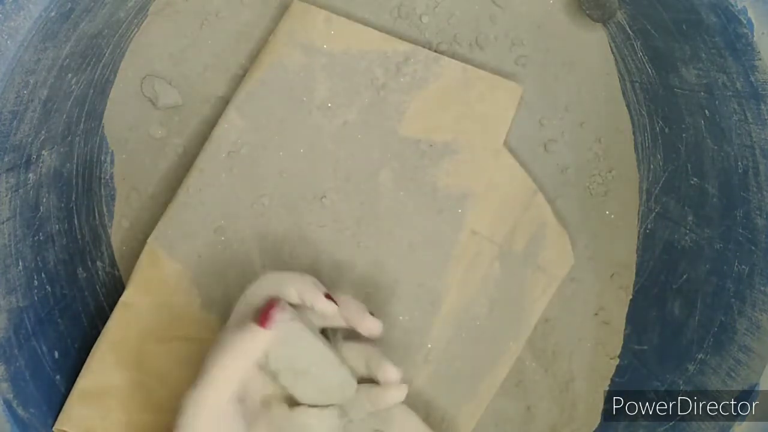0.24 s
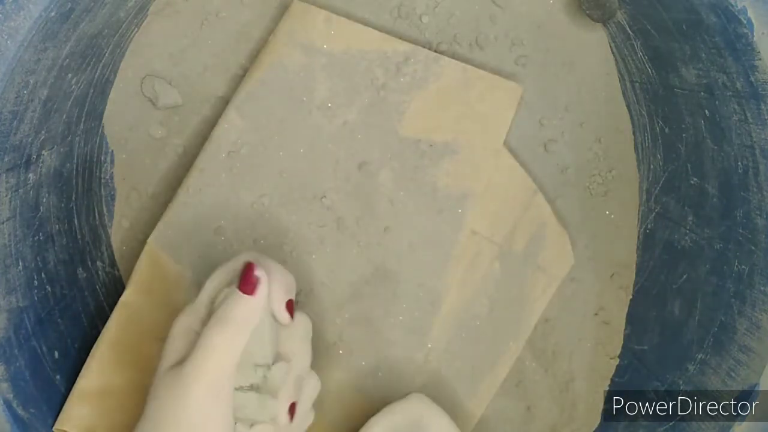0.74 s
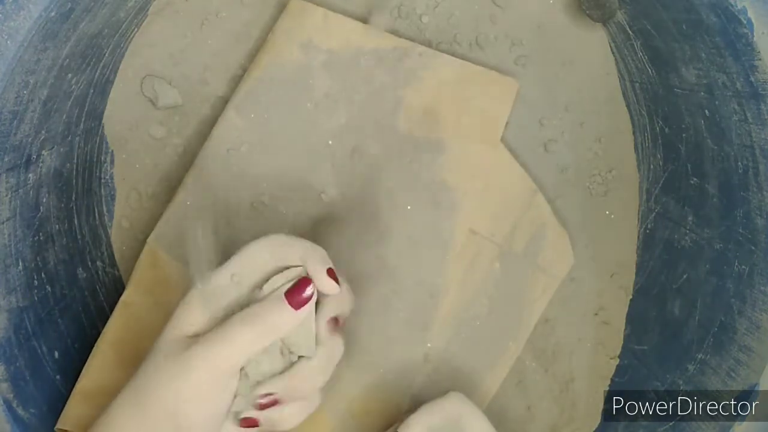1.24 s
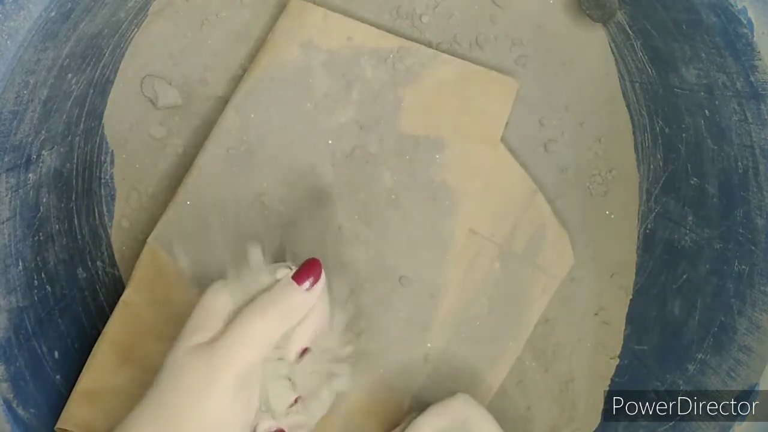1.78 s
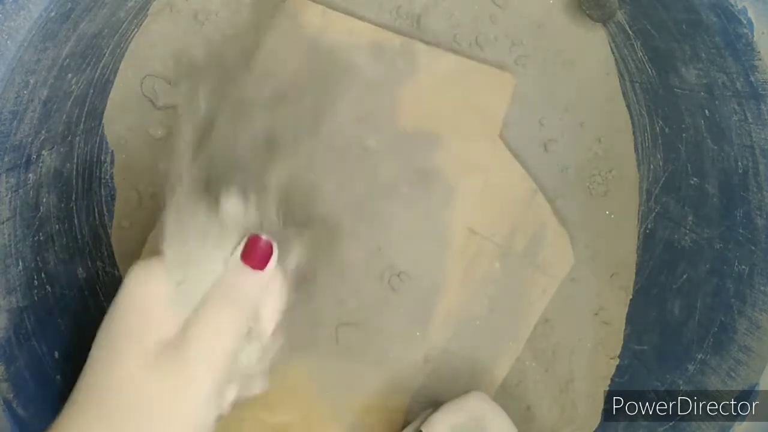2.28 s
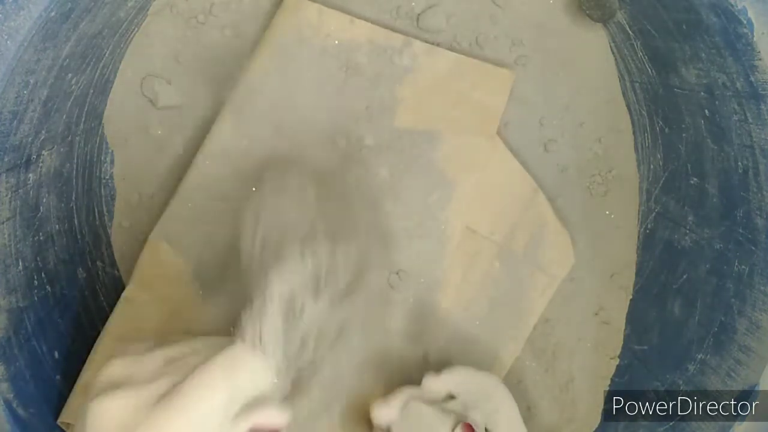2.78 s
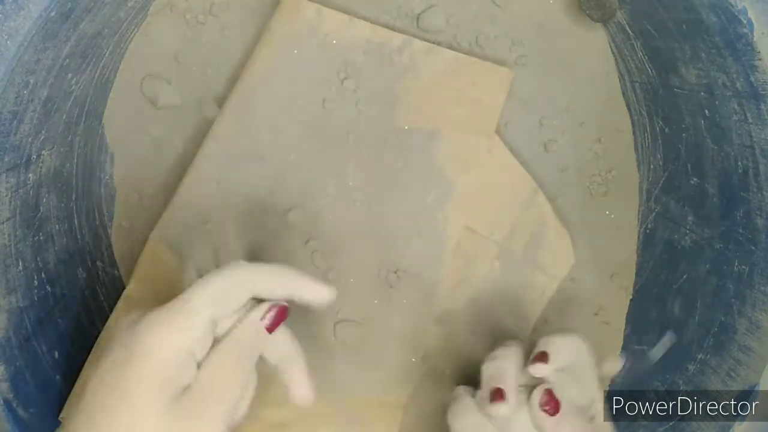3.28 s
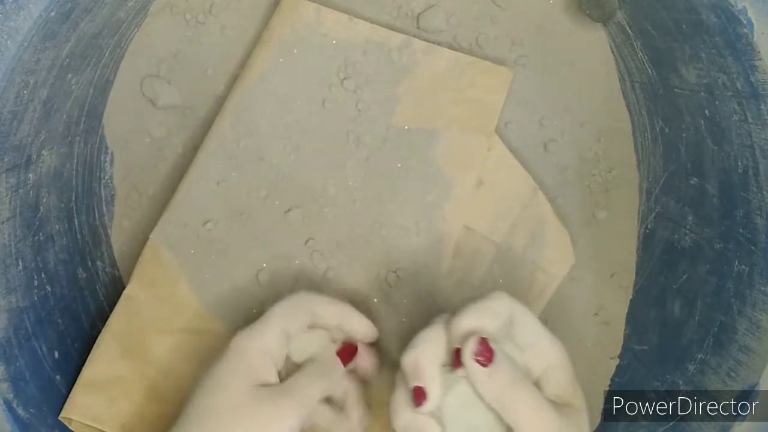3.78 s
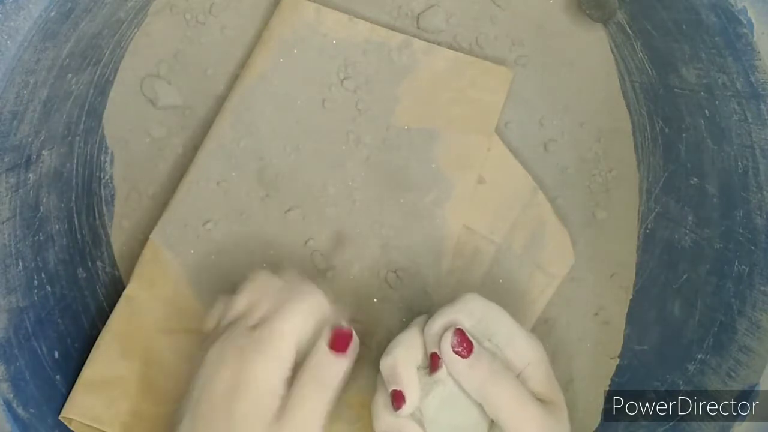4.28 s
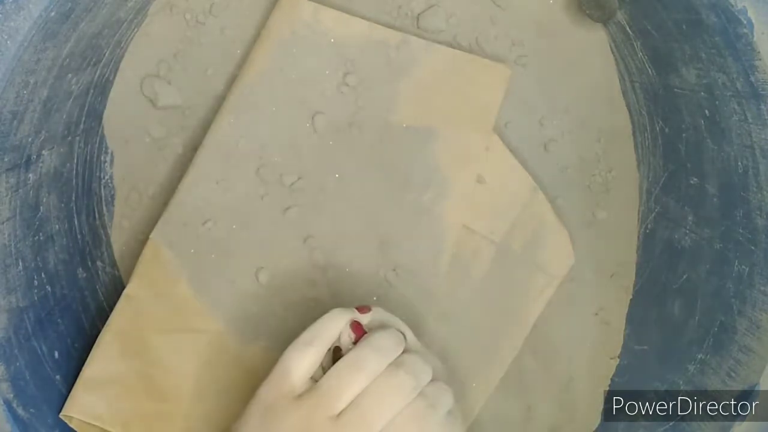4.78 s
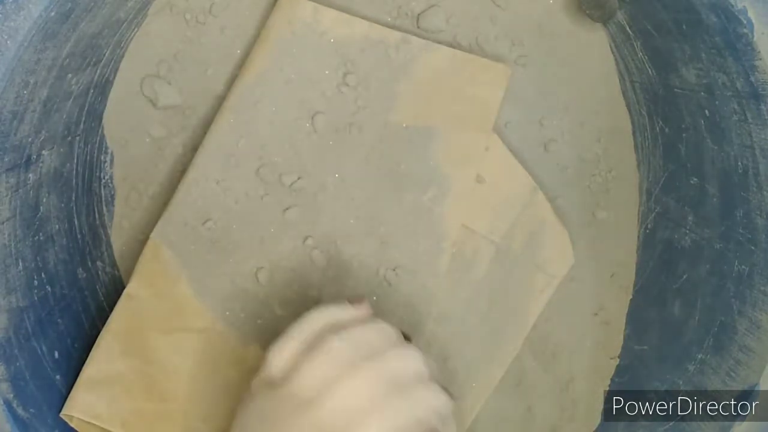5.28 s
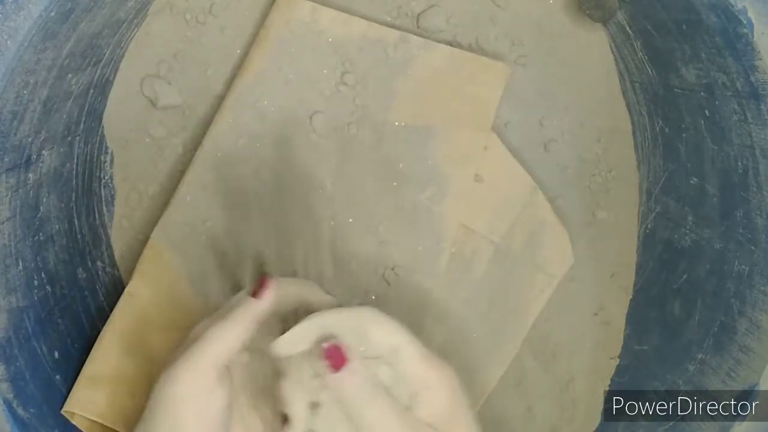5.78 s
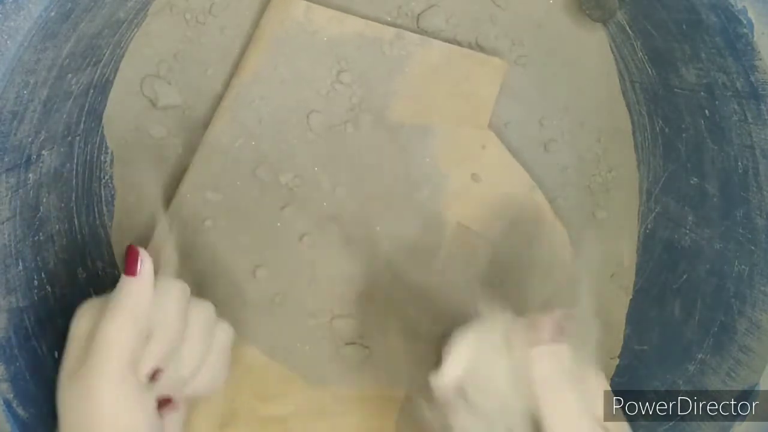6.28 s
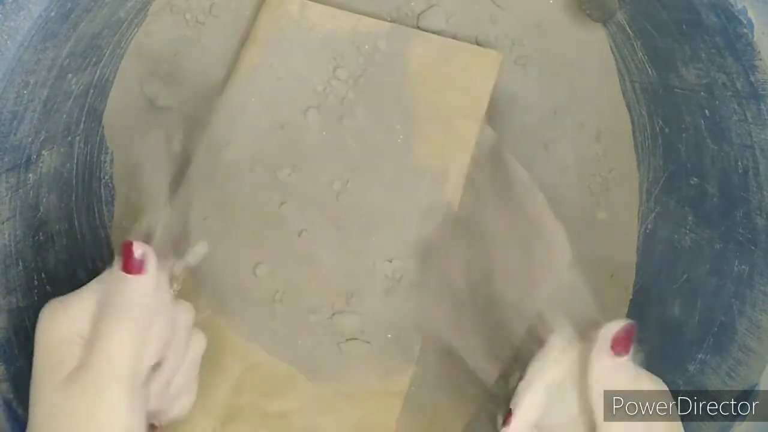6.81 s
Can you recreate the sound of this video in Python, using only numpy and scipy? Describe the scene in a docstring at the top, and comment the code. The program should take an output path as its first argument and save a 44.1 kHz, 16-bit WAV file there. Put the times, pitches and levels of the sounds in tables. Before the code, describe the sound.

Dry lumps of sand and cement are crushed between fingers up close, hissing grittily, snapping crisply and pattering onto cardboard in a plastic basin.

```python
"""Crushing dry sand and cement lumps

Two hands crush dry lumps of sand and cement over a sheet of cardboard in a plastic basin, close to a phone.
Filtered random clicks make the grinding and hissing; short noise bursts with a ring make the snaps.
Crumbs and larger pieces patter on the cardboard as clicks, knocks and thuds.
The basin rings faintly under every fall, in a small quiet room made of fading noise reflections."""
import sys
import numpy as np
from scipy import signal
from scipy.fft import rfft, irfft
from scipy.io import wavfile

SR = 44100
rng = np.random.default_rng(int(sys.argv[2]) if len(sys.argv) > 2 else 0)


def store_pcm(level_fs):
    """Save levels as 16-bit WAV."""
    pcm = np.round(np.clip(level_fs, -1, 1) * 32767).astype(np.int16)
    wavfile.write(sys.argv[1], SR, np.atleast_2d(pcm).T)


N = 310772


def amp(db):
    """Turn decibels into gain."""
    return 10 ** (np.asarray(db) / 20)


def unit(x):
    """Scale to an rms of 1."""
    return x / np.sqrt(np.mean(x ** 2))


def add(out, s, sound):
    """Mix a short stereo sound in at time s, in seconds."""
    start = max(int(s * SR), 0)
    part = out[:, start:start + sound.shape[-1]]
    part += sound[..., :part.shape[-1]]


def convolve(x, response):
    """Pass both channels through an impulse response."""
    return signal.fftconvolve(x, np.atleast_2d(response), axes=-1)[:, :x.shape[-1]]


def colour(x, points, size=2048):
    """Shape a sound's spectrum to follow (f/Hz, level/dB) points, with a causal filter of unit energy."""
    hz, db = np.transpose(points)
    bins_hz = np.fft.rfftfreq(size, 1 / SR) + 1
    log_gain = np.log(amp(np.interp(np.log(bins_hz), np.log(hz), db)))
    # folding the cepstrum forward makes the filter answer as early as it can
    cepstrum = irfft(log_gain)
    cepstrum[1:size // 2] *= 2
    cepstrum[size // 2 + 1:] = 0
    response = irfft(np.exp(rfft(cepstrum)))
    return convolve(x, response / np.linalg.norm(response))


def stereo_noise(count, width):
    """White noise whose side part is width times its middle."""
    mid, side = rng.standard_normal((2, count))
    return np.array([mid + width * side, mid - width * side]) / np.sqrt(1 + width ** 2)


def nearer_right(x):
    """Sound from the right of the phone reaches the left port 4 samples later."""
    return np.array([np.roll(x[0], 4), x[1]])


def grains(rate, spread_db, lag_samples, size=60000):
    """Clicks of uneven size at random moments, rate per second; each reaches the two ports with its own delay."""
    gap, strength = rng.exponential(size=(2, size))
    lag = rng.standard_normal(size) * lag_samples
    at = np.cumsum(gap) * SR / rate
    gain = amp(spread_db * np.minimum(strength, 4)) * rng.choice([-1, 1], size)
    places = np.clip([at - lag / 2, at + lag / 2], 0, N).astype(int)
    return unit(np.array([np.bincount(p, gain, N + 1)[:N] for p in places]))


def grip(t, start, attack, hold, release_s, tail_s, tail_db):
    """One squeeze builds up, holds and lets go, leaving a slow quiet tail."""
    eased = np.maximum(t - start - attack - hold, 0)
    tail = min(amp(tail_db), 1)
    build = np.clip((t - start) / attack, 0, 1)
    return build * ((1 - tail) * np.exp(-eased / release_s) + tail * np.exp(-eased / tail_s))


# when the grip eases the grinding dies quickly, while loosened sand trickles on more quietly
RELEASE_S, TRICKLE_S, TRICKLE_DB = 0.034, 0.33, -12.5
# crumbs reach the cardboard a moment later and lose their strength more slowly at first
FALL_DELAY_S, FALL_RELEASE_S, STRAGGLE_S, STRAGGLE_DB = 0.0039, 0.08, 0.069, -16
# coarse grains fade sooner than the sand
CRUNCH_RELEASE_S, CRUNCH_TAIL_S, CRUNCH_TAIL_DB = 0.026, 0.16, -7.5
# squeezes of the fingers, levels before each layer's own gain: (start t/s, attack t/s, hold t/s,
# sand hiss level/dB, coarse crunch level/dB, falling crumbs level/dB, fineness of the sand level/dB)
FINGER_SQUEEZES = [(0.0, 0.0012, 0.11, -42.5, -59, -72, 4), (0.148, 0.012, 0.082, -51, -59.5, -95, -6),
                   (0.301, .01, 0.069, -46, -52, -66, -1), (0.387, 0.016, 0.042, -40, -43.5, -46.5, 1),
                   (0.528, 0.048, 0.074, -34, -48, -60.5, -1.5),
                   (0.866, 0.023, 0.16, -32.5, -41.5, -38.5, -5),
                   (1.059, 0.029, 0.051, -34, -51, -36, -10.5), (1.296, 0.048, 0.18, -51.5, -57.5, -99, 25),
                   (1.474, 0.0064, 0.091, -41.5, -47.5, -53, -7),
                   (1.617, 0.024, 0.083, -53, -55, -48.5, -11), (1.703, 0.026, 0.12, -35, -52.5, -44.5, -6),
                   (1.942, 0.0076, 0.14, -34.5, -41.5, -39, 5),
                   (1.992, 0.037, 0.068, -27.5, -60, -41.5, -8.5),
                   (2.01, 0.0018, 0.007, -35, -38.5, -37, -6), (2.262, 0.068, 0.059, -41.5, -79, -47, -9),
                   (2.423, 0.026, 0.062, -33, -36.5, -36.5, 1.5),
                   (2.603, 0.024, 0.023, -29, -45.5, -42.5, -3),
                   (2.657, 0.058, 0.041, -31.5, -30, -32.5, 21.5),
                   (2.916, 0.056, 0.034, -27, -44, -38.5, -8), (3.131, 0.0082, 0.07, -29, -37, -41, 1.5),
                   (3.392, 0.0095, 0.028, -34.5, -42, -56, 5), (3.431, 0.0065, 0.011, -23, -36, -32.5, -7),
                   (3.573, 0.082, 0.056, -44, -42, -42, -2), (3.705, 0.027, 0.3, -40.5, -56.5, -89, -5.5),
                   (4.234, 0.055, 0.056, -35, -52, -42.5, -8.5),
                   (4.425, 0.035, 0.062, -32, -42.5, -50.5, -4.5),
                   (4.789, 0.012, 0.077, -31, -43, -45, 2.5),
                   (4.932, 0.0068, 0.13, -38, -42.5, -54.5, -6.5),
                   (5.234, 0.0064, 0.2, -30.5, -38.5, -43, 1.5),
                   (5.514, 0.031, 0.1, -30.5, -37, -41.5, -0.5), (5.674, 0.019, 0.14, -38, -43, -44.5, 5),
                   (5.845, 0.02, 0.043, -31.5, -51, -39.5, -3),
                   (5.893, 0.058, 0.14, -29.5, -46.5, -45.5, -7),
                   (6.11, 0.032, 0.042, -27.5, -48, -45, -9.5),
                   (6.233, 0.031, 0.058, -20, -60, -32.5, -11.5),
                   (6.3, 0.012, 0.16, -31.5, -42.5, -45, -13.5),
                   (6.487, 0.02, 0.19, -30, -60, -47.5, -10.5), (6.67, 0.13, 0.04, -31, -45, -42.5, -3),
                   (6.872, 0.007, 0.098, -24, -61, -41, -11.5), (6.983, 0.046, .05, -24, -51, -41, -9)]


def hands(count=7000):
    """The squeezes add up to levels of hiss, crunch and crumbs; the louder ones weigh more in how fine the sand is."""
    t = np.linspace(0, N / SR, count)
    # powers start just above zero so that their logarithm exists
    hiss, crunch, fall, fine = np.full((4, count), 1e-12)
    for start, attack, hold, hiss_db, crunch_db, fall_db, fine_db in FINGER_SQUEEZES:
        grind = grip(t, start, attack, hold, RELEASE_S, TRICKLE_S, TRICKLE_DB)
        shower = grip(t - FALL_DELAY_S, start, attack, hold, FALL_RELEASE_S, STRAGGLE_S, STRAGGLE_DB)
        coarse = grip(t, start, attack, hold, CRUNCH_RELEASE_S, CRUNCH_TAIL_S, CRUNCH_TAIL_DB)
        power = (amp(hiss_db) * grind) ** 2
        hiss += power
        fine += power * fine_db
        crunch += (amp(crunch_db) * coarse) ** 2
        fall += (amp(fall_db) * shower) ** 2
    levels_db = 10 * np.log10([hiss, crunch, fall])
    every_sample = np.arange(N) / SR
    return [np.interp(every_sample, t, curve) for curve in (*levels_db, fine / hiss)]


def slips(rate, depth_db, relax_s):
    """A gain that jumps at each slip and relaxes until the next."""
    jumps = (rng.random(N) < rate / SR) * rng.exponential(size=N)
    strain = signal.lfilter([1], [1, -np.exp(-1 / (relax_s * SR))], jumps)
    return unit(amp(depth_db * np.minimum(strain, 2)))


def ticks(count=2000):
    """Single coarse grains pop loose and ring for a few cycles, each with its own size, pitch and place."""
    out, t = np.zeros((2, N)), np.arange(128) / SR
    for when, size, pitch, place, lag in rng.random((count, 5)):
        hz = 2200 + 8300 * np.sqrt(pitch)
        phase = np.array([[0], [np.pi * (lag - .5)]])
        ring = np.sin(2 * np.pi * hz * t + phase) * np.exp(-t * hz / 2)
        balance = np.sqrt(hz * np.array([[place], [1 - place]]))
        add(out, when * N / SR, amp(14 * size ** 2) * balance * ring)
    # such small grains radiate no bass
    return unit(signal.lfilter(*signal.butter(2, 1800, "high", fs=SR), out))


# tone of the sand, of its finest powder and of the coarse grains: (f/Hz, level/dB)
SAND_TONE = [(80, -63), (300, -45.5), (1100, -14), (1800, -17.5), (3500, -18), (5000, -8), (6500, 0.5),
             (7800, 2.5), (9500, -7), (12000, -7.5), (14500, -12)]
POWDER_TONE = [(200, -58.5), (900, -29), (2000, -18.5), (6000, -15), (8800, 0.5), (10500, 0.5), (12500, -4),
               (14500, -8)]
CRUNCH_TONE = [(60, -52.5), (200, -22.5), (600, -7.5), (1200, -4.5), (1900, 9), (2700, 6.5), (4200, -0.5),
               (7000, 6.5), (14000, -43)]


def grinding(hiss_db, crunch_db, fine_db):
    """Grains shear past each other in small slips; finer sand hisses higher, and lone grains tick under a light grip."""
    sand_grains = grains(rate=4500, spread_db=2.8, lag_samples=1.6)
    powder_grains = grains(rate=8000, spread_db=2.2, lag_samples=2.2)
    coarse_grains = grains(rate=600, spread_db=3.4, lag_samples=4)
    sand = colour(sand_grains, SAND_TONE) * amp(hiss_db - 0.58 * fine_db - 10.5)
    powder = colour(powder_grains, POWDER_TONE) * amp(hiss_db + 0.61 * fine_db - 3.5)
    crunch = nearer_right(colour(coarse_grains, CRUNCH_TONE)) * amp(crunch_db - 2.5)
    # single grains slip quickly; whole flakes give way more slowly
    slipping = slips(rate=120, depth_db=1.7, relax_s=.003) * slips(rate=28, depth_db=2.4, relax_s=.012)
    # the ticks follow the hiss less than fully, so they stand out when it is quiet
    pops = ticks() * amp(.85 * hiss_db - 16.5)
    return (sand + powder + crunch) * slipping + pops


# fractures between the fingers: (t/s, level/dB before a shared gain, ring of the broken piece f/Hz)
LUMP_SNAPS = [(0.315, -45, 6160), (0.844, -34, 2130), (0.903, -18.5, 4070), (0.9058, -19, 7450),
              (0.962, -25, 8900), (0.975, -30, 7600), (0.985, -17.5, 3720), (1.1102, -22, 6300),
              (1.1099, -15, 7700), (1.123, -29, 7600), (1.178, -26.5, 7630), (1.318, -32.5, 7240),
              (1.4472, -29, 9300), (1.498, -29, 6310), (1.566, -35.5, 5260), (1.6205, -33, 5150),
              (1.725, -29.5, 7430), (1.760, -24, 7900), (1.9385, -23, 8880), (1.953, -30, 4000),
              (1.956, -30, 7400), (2.002, -27, 6760), (2.0182, -17.5, 6900), (2.024, -22, 7300),
              (2.356, -28.5, 7300), (2.4955, -35.5, 7300), (2.602, -26.5, 9600), (2.858, -29, 7700),
              (3.154, -32, 2180), (3.292, -26, 10140), (3.4366, -22.5, 8260), (3.461, -21, 2960),
              (3.525, -28.5, 7600), (3.645, -27.5, 2540), (3.7895, -21.5, 7320), (3.869, -30, 7900),
              (3.883, -31.5, 8700), (3.9206, -30, 8000), (3.95, -32, 7500), (4.023, -35, 6950),
              (4.083, -36.5, 7830), (4.148, -42, 5700), (4.2335, -35, 7800), (4.4168, -26, 7200),
              (4.4215, -21, 7400), (4.6, -30.5, 7940), (4.684, -34, 2170), (4.744, -30.5, 6700),
              (4.799, -31.5, 11000), (4.955, -33.5, 5500), (5.216, -29, 2540), (5.23, -28.5, 8400),
              (5.252, -28, 4600), (5.443, -23, 8500), (5.444, -26.5, 4250), (5.743, -33.5, 4000),
              (5.806, -30.5, 9050), (6.025, -24.5, 7500), (6.045, -23.5, 6700), (6.13, -25, 7700),
              (6.246, -18.5, 6070), (6.298, -17, 7300), (6.43, -27, 7500), (6.53, -23, 7150),
              (6.666, -35, 7250), (6.82, -27, 2280), (6.8785, -27, 6100), (6.914, -19, 7630)]
# tone of the crack and its loose grains: (f/Hz, level/dB)
FRACTURE_TONE = [(50, -44), (200, -10), (1000, -5.5), (2500, -10.5), (3700, -5.5), (4800, 0), (7200, 13),
                 (9500, 5.5), (14500, -0.5)]


def fractures(crack_s=0.00047, growth=0.2, crumble_db=-21, crumble_s=0.0028, strain_db=-22, strain_s=0.0035):
    """Grains give way just before a crack runs, longer in a big lump; the piece rings and loose grains follow."""
    out, t = np.zeros((2, N)), np.arange(-512, 2048) / SR
    age = np.maximum(t, 0)
    before = amp(strain_db) * np.exp(t / strain_s)
    after = amp(crumble_db) * np.exp(-age / crumble_s)
    loose = np.where(t < 0, before, after)
    typical_db = np.mean([db for _, db, _ in LUMP_SNAPS])
    for s, db, hz in LUMP_SNAPS:
        # a louder snap stands for a bigger lump
        run = age / (crack_s * amp(growth * (db - typical_db)))
        crack = run * np.exp(1 - run)
        split = colour(stereo_noise(len(t), width=0.91), FRACTURE_TONE) * crack
        split *= np.linalg.norm(crack) / np.linalg.norm(split, axis=1, keepdims=True)
        # cubing the noise leaves sparse peaks, like separate grains
        debris = unit(colour(stereo_noise(len(t), width=0.84) ** 3, FRACTURE_TONE)) * loose
        ring = .75 * np.sin(2 * np.pi * hz * t) * crack
        add(out, s + t[0], amp(db + 1.5) * (split + debris + ring))
    return out


# hard lumps knocking together in the hand: (t/s, level/dB, ring f/Hz)
LUMP_CLACKS = [(2.151, -32.5, 1510), (2.462, -23.5, 1730), (2.495, -16.5, 1280), (3.2, -27, 1760),
               (3.3475, -31.5, 1850), (3.461, -24.5, 1700), (4.745, -36, 1340), (5.885, -34, 1320),
               (6.821, -31.5, 1906)]


def clacks(decay_s=0.004, overtone=1.114, overtone_db=-5):
    """A hard lump struck by another rings for a moment on two close modes."""
    out, t = np.zeros((2, N)), np.arange(2048) / SR
    for s, db, hz in LUMP_CLACKS:
        ring = np.sin(2 * np.pi * hz * t) + amp(overtone_db) * np.sin(2 * np.pi * hz * overtone * t)
        add(out, s, amp(db) * ring * np.exp(-t / decay_s))
    # a small lump radiates no bass
    return signal.lfilter(*signal.butter(2, 600, "high", fs=SR), out)


def knock(hz):
    """Damped cardboard gives way and springs back: a dip, one sharp crest and a dip, the crest one period in."""
    turn = np.pi * (np.arange(SR // 50) / SR * hz - 1)
    return (1 - 2 * turn ** 2) * np.exp(-turn ** 2)


# larger pieces landing on the cardboard, levels before each layer's own gain:
# (t/s, knock level/dB, knock f/Hz, thud of the whole sheet level/dB)
PIECE_LANDINGS = [(0.405, -22, 796, -66), (0.442, -25.5, 610, -56), (0.8437, -11.5, 940, -49),
                  (0.905, -4, 600, -26), (0.986, -12, 640, -35.5), (1.05, -27, 420, -42),
                  (1.1112, -12.5, 524, -32.5), (1.126, -14.5, 595, -46), (1.176, -24, 570, -50),
                  (1.499, -16, 1040, -75), (1.621, -15.5, 755, -52), (1.771, -8, 710, -36),
                  (1.8397, -23.5, 900, -55), (1.877, -20.5, 810, -49), (1.940, -16.5, 840, -42),
                  (1.952, -11, 830, -49), (1.957, -14.5, 1060, -67), (1.9694, -14, 690, -66),
                  (2.0191, -17, 460, -33), (2.0312, -17, 1010, -52), (2.068, -18, 840, -55),
                  (2.137, -31, 450, -55), (2.2473, -16.5, 726, -39), (2.374, -26, 790, -58),
                  (2.4624, -17.5, 1100, -43), (2.496, -11, 600, -37.5), (2.539, -13.5, 1010, -52),
                  (2.602, -15, 880, -46), (2.703, -11, 565, -31), (2.721, -27, 700, -39.5),
                  (2.743, -21, 700, -63), (2.766, -20, 1100, -59), (2.787, -17, 615, -43.5),
                  (2.811, -25, 596, -49), (3.0508, -29.5, 790, -58), (3.153, -17, 1410, -80),
                  (3.200, -15, 650, -45), (3.348, -25.5, 900, -56), (3.44, -18, 577, -51),
                  (3.4623, -9, 540, -42), (3.557, -27.5, 805, -48), (3.645, -18.5, 796, -61),
                  (3.688, -21, 573, -49.5), (4.236, -39, 395, -56), (4.301, -36, 900, -55),
                  (4.322, -29, 800, -55), (4.3441, -25, 865, -45.5), (4.488, -25, 1570, -54),
                  (4.55, -31, 1600, -76), (4.6845, -24.5, 1460, -76), (4.745, -40, 500, -54),
                  (4.840, -19, 1440, -56), (4.904, -27, 1190, -78), (4.955, -21, 1130, -55),
                  (4.971, -16.5, 1420, -81), (5.051, -26.5, 1670, -81), (5.215, -19, 1880, -64),
                  (5.248, -23.5, 810, -45.5), (5.319, -27, 880, -60), (5.368, -35, 794, -59),
                  (5.375, -19.5, 490, -44), (5.443, -17.5, 530, -36), (5.4514, -20, 800, -60),
                  (5.5492, -17, 870, -42), (5.555, -18.5, 945, -41), (5.599, -22, 420, -41),
                  (5.7092, -21, 690, -51), (5.7356, -19.5, 665, -52), (5.742, -23.5, 710, -50),
                  (5.8851, -27, 1210, -46), (6.292, -15.5, 900, -62), (6.299, -14, 1100, -67),
                  (6.3635, -17.5, 900, -63), (6.377, -20.5, 604, -41.5), (6.386, -20, 1040, -73),
                  (6.468, -18.5, 1230, -58), (6.527, -23, 1110, -62), (6.557, -21.5, 970, -48),
                  (6.5835, -18, 765, -51), (6.718, -24, 900, -56), (6.8207, -16, 1060, -54),
                  (6.916, -23.5, 810, -49), (7.032, -16, 685, -73)]
# tone of grit and crumbs on the cardboard: (f/Hz, level/dB)
CARDBOARD_TONE = [(60, -28.5), (150, -24.5), (240, -13.5), (500, 0.5), (900, -5.5), (1500, -7), (2200, -15),
                  (4000, -20), (12000, -101)]


def landings(bounce_db=-17, scatter_s=0.0073, scatter_db=-20):
    """Each piece knocks, tips over with a second lighter knock and scatters grit."""
    knocks, grit = np.zeros((2, 2, N))
    t = np.arange(4096) / SR
    for s, db, hz, _ in PIECE_LANDINGS:
        delay, pitch = rng.random(2)
        # start a period early so that the crest falls on the landing
        add(knocks, s - 1 / hz, amp(db - 4.0) * knock(hz))
        add(knocks, s + 0.00504 * delay, amp(db + bounce_db) * knock(hz * (.8 + pitch)))
        add(grit, s, amp(db + scatter_db) * np.exp(-t / scatter_s) * stereo_noise(len(t), width=0.7))
    # a small patch of cardboard radiates little bass
    knocks = signal.lfilter(*signal.butter(3, 200, "high", fs=SR), knocks)
    return knocks + colour(grit, CARDBOARD_TONE)


def crumbs(fall_db):
    """A shower of small crumbs drums on the cardboard as random clicks."""
    return colour(grains(rate=330, spread_db=4.5, lag_samples=8.7), CARDBOARD_TONE) * amp(fall_db - 6.0)


# tone of the fluttering sheet: (f/Hz, level/dB)
THUD_TONE = [(60, -44.5), (150, -20), (200, -6), (290, -2.5), (420, -3), (650, -17.5), (1500, -25),
             (6000, -92)]


def thuds(sheet_hz=270, sheet_db=14.5, flutter_s=0.057, flutter_db=-4.5):
    """Pieces flex the whole sheet, at a random pitch standing for where they land; it flutters on briefly."""
    flex, flutter = np.zeros((2, 2, N))
    t = np.arange(SR // 4) / SR
    swing = (1 - np.exp(-t / .0015)) * np.exp(-t / .0045)
    for s, _, _, db in PIECE_LANDINGS:
        hz = sheet_hz * (1 + .3 * rng.random())
        add(flex, s, amp(db + sheet_db) * np.cos(2 * np.pi * hz * t) * swing)
        add(flutter, s, amp(db + flutter_db) * np.exp(-t / flutter_s) * stereo_noise(len(t), width=0.32))
    flex = signal.lfilter(*signal.butter(4, 210, "high", fs=SR), flex)
    return flex + colour(flutter, THUD_TONE)


# the air in the basin and its wall: (f/Hz, time to fall by 60 dB t/s, level/dB)
BASIN_MODES = [(198, .3, -60), (236, .3, -63), (287, .15, -56), (301, .22, -53), (620, .2, -58),
               (720, .16, -61), (1180, .18, -64)]


def basin(falls):
    """The basin's modes are decaying sine tones, shaken by whatever lands in it."""
    t = np.arange(SR) / SR
    ring = 0
    for hz, t60, db in BASIN_MODES:
        ring = ring + amp(db) * np.sin(2 * np.pi * hz * t) * np.exp(-np.log(1000) * t / t60)
    return convolve(falls, ring)


# soft low booms from the floor of the basin: (t/s, level/dB)
BASIN_BOOMS = [(2.019, -47.5), (2.101, -59), (2.719, -60)]
# tone of the rumble: (f/Hz, level/dB)
RUMBLE_TONE = [(40, -37), (70, -12), (87, -3.5), (110, -9), (170, -9), (300, -6), (2000, -70)]


def rumble(decay_s=0.2):
    """The floor of the basin booms softly now and then, as fading low noise."""
    out, t = np.zeros((2, N)), np.arange(SR) / SR
    for s, db in BASIN_BOOMS:
        add(out, s, amp(db) * np.exp(-t / decay_s) * stereo_noise(len(t), width=0.19))
    return colour(out, RUMBLE_TONE)


# room reverberation in octave bands: (band centre f/Hz, time to fall by 60 dB t/s, level/dB)
ROOM_BANDS = [(247, 0.53, -10.5), (520, 0.28, -25.5), (986, 0.48, -6), (2190, 0.11, -2.5),
              (4260, 0.04, -0.5), (8930, 0.06, -8.5)]


def reflections(delay_s=0.0019):
    """Diffuse reflections from one place, mostly shorter in the treble and more alike at both ports in the bass."""
    t, tail = np.arange(SR // 2) / SR, 0
    for hz, t60, db in ROOM_BANDS:
        octave = signal.butter(2, [hz / np.sqrt(2), hz * np.sqrt(2)], "band", fs=SR, output="sos")
        fade = np.exp(-np.log(1000) * t / t60) * (t > delay_s)
        noise = signal.sosfilt(octave, stereo_noise(len(t), width=min(hz / 1200, 1)))
        tail = tail + amp(db) * noise * fade / np.linalg.norm(fade)
    return tail


def room(x, count=24):
    """The hands keep moving, so one pattern of reflections fades into the next."""
    out, hop = np.zeros((2, N)), N // count + 1
    for centre in range(0, N + hop, hop):
        span = np.arange(max(centre - hop, 0), min(centre + hop, N))
        part = x[:, span] * np.cos(np.pi / 2 * (span - centre) / hop)
        add(out, span[0] / SR, signal.fftconvolve(part, reflections(), axes=-1))
    return out


# tone of the quiet background: (f/Hz, level/dB)
BACKGROUND_TONE = [(25, -8), (55, 8), (85, 10.5), (125, 11), (300, -29.5), (1000, -39), (4000, -5.5),
                   (14000, -11.5)]


def room_tone():
    """The quiet room is a faint, steady, coloured noise."""
    return amp(-69) * colour(stereo_noise(N, width=0.28), BACKGROUND_TONE)


def scene():
    """Hands above, cardboard and basin below, the room around them."""
    hiss_db, crunch_db, fall_db, fine_db = hands()
    falls = nearer_right(landings() + thuds() + crumbs(fall_db))
    crushing = grinding(hiss_db, crunch_db, fine_db) + fractures() + nearer_right(clacks())
    near = crushing + falls + basin(falls) + rumble()
    return near + room(near) + room_tone()


TOP_HZ = 14400
# microphone ports, left then right:
# (resonance f/Hz, width f/Hz, resonance level/dB, treble shelf level/dB, gain level/dB)
MIC_PORTS = [(7980, 1110, 1.5, -3.5, -0.26), (6960, 950, 2, -30, -1.94)]


def record(dry):
    """Each microphone port rings at its own pitch in the treble; the top is cut steeply."""
    out = []
    for x, (hz, width_hz, ring_db, shelf_db, gain_db) in zip(dry, MIC_PORTS):
        treble = signal.lfilter(*signal.butter(1, 9000, "high", fs=SR), x)
        x = x + (amp(shelf_db) - 1) * treble
        ring = signal.lfilter(*signal.iirpeak(hz, hz / width_hz, fs=SR), x)
        out.append(amp(gain_db) * (x + amp(ring_db) * ring))
    return signal.sosfilt(signal.ellip(10, .2, 70, TOP_HZ, fs=SR, output="sos"), out)


dry = scene()
out = record(dry)
store_pcm(out)
```